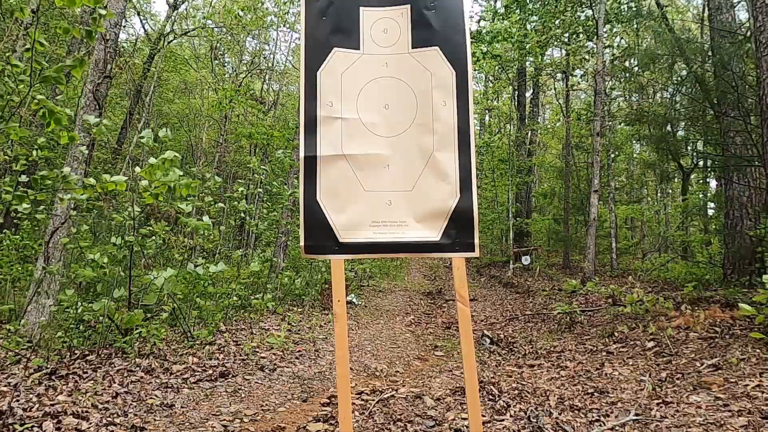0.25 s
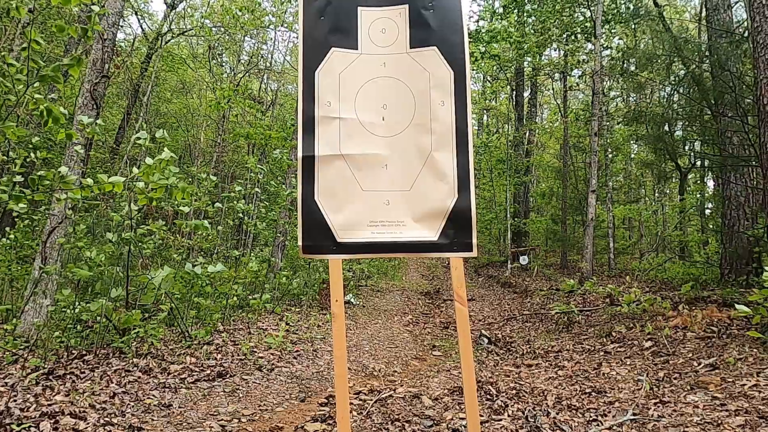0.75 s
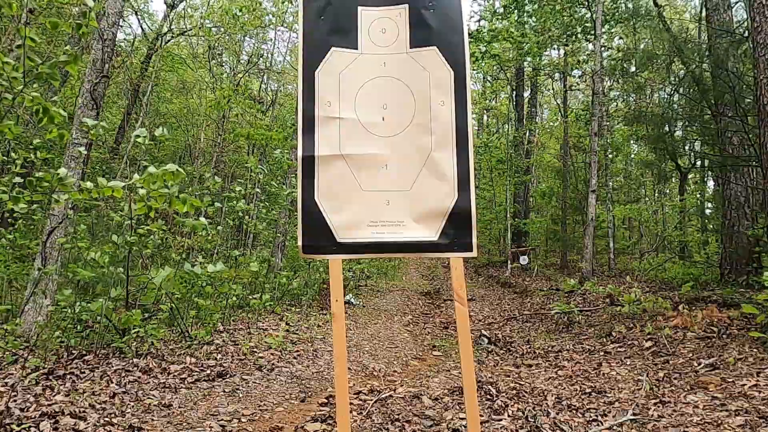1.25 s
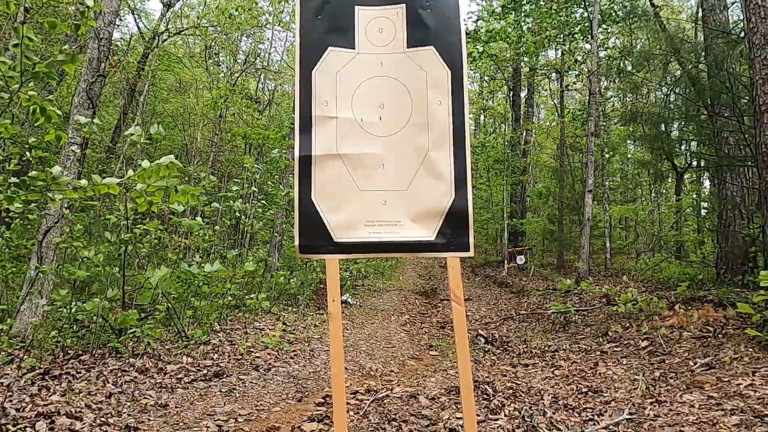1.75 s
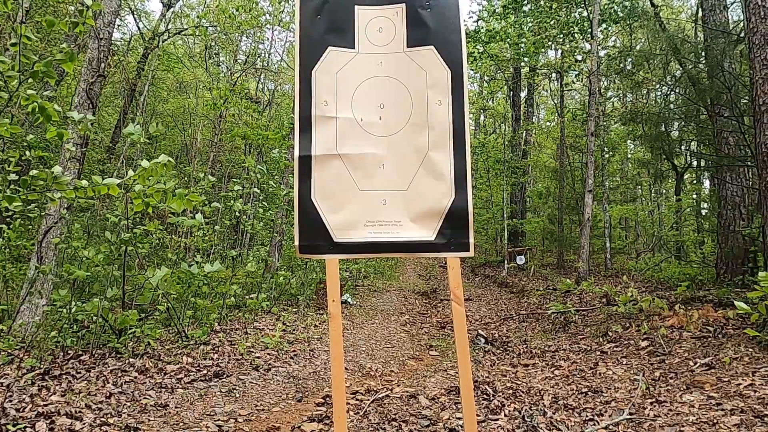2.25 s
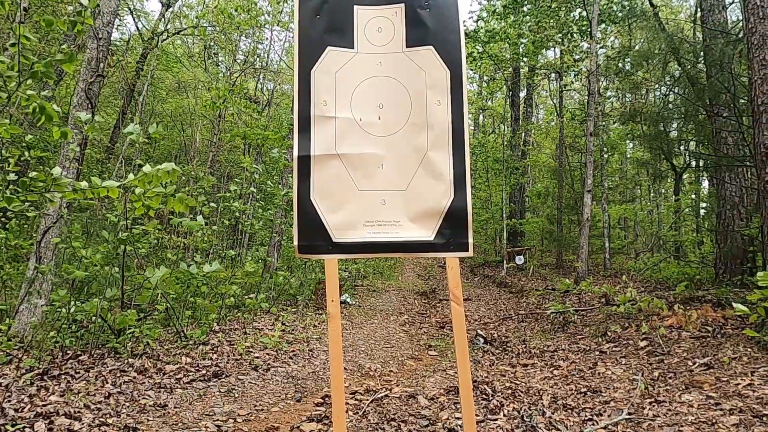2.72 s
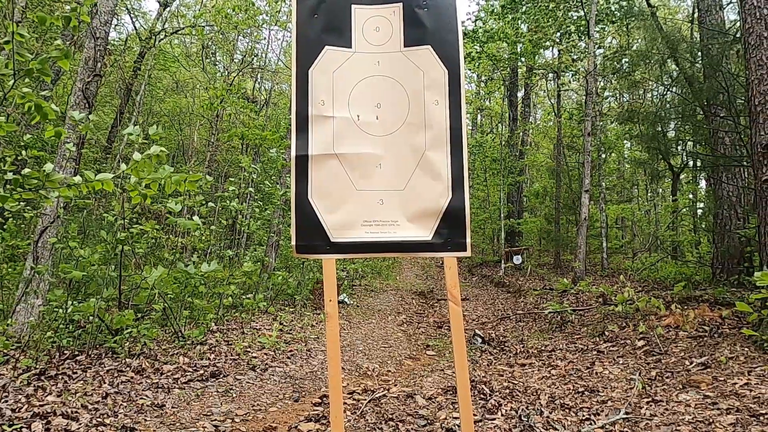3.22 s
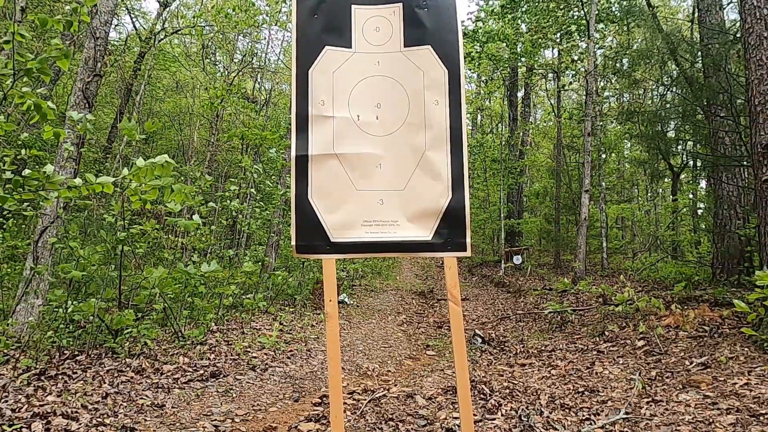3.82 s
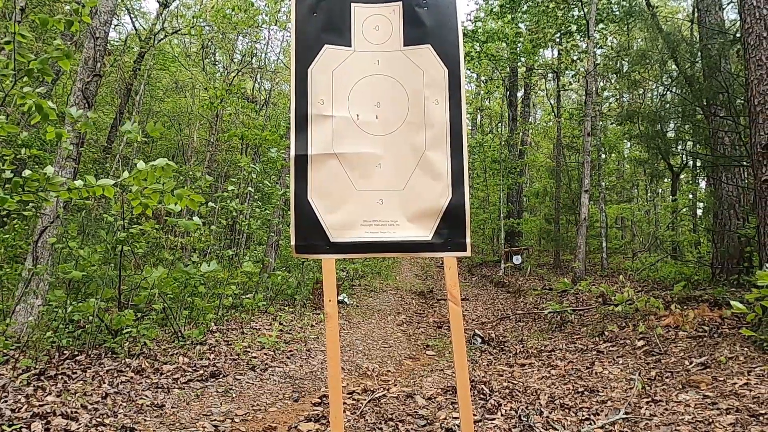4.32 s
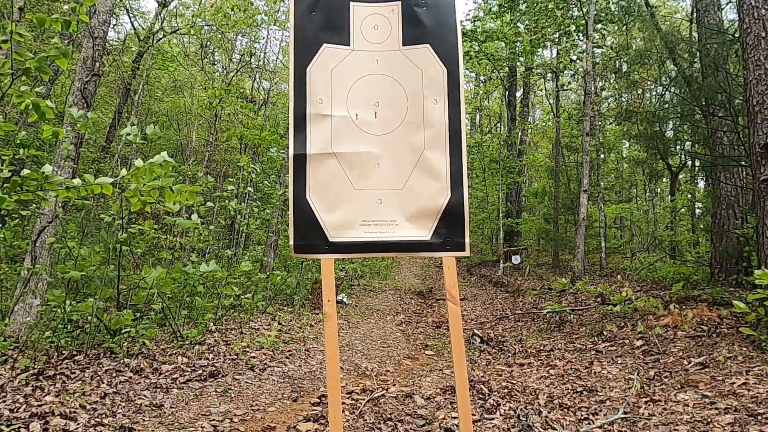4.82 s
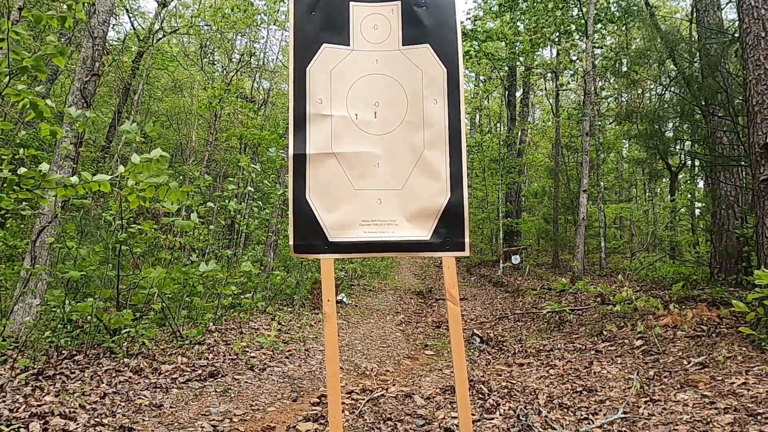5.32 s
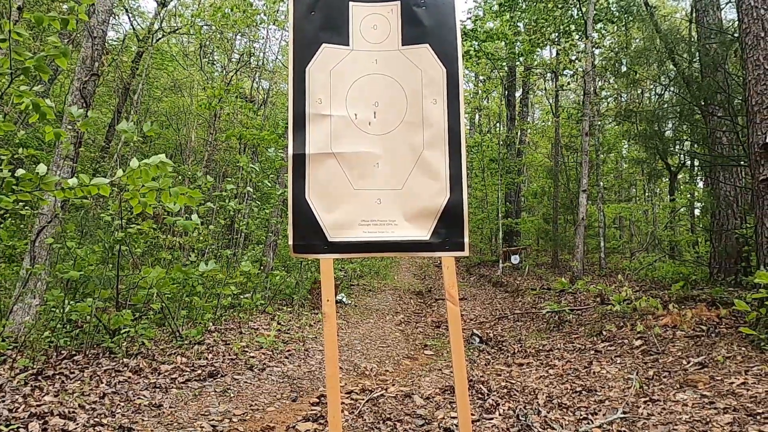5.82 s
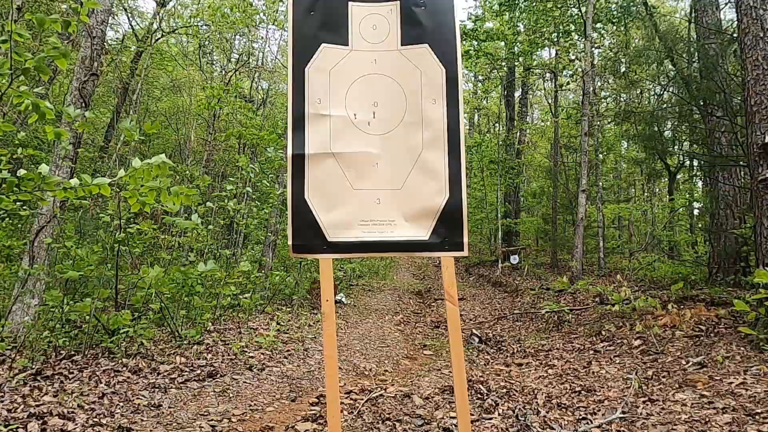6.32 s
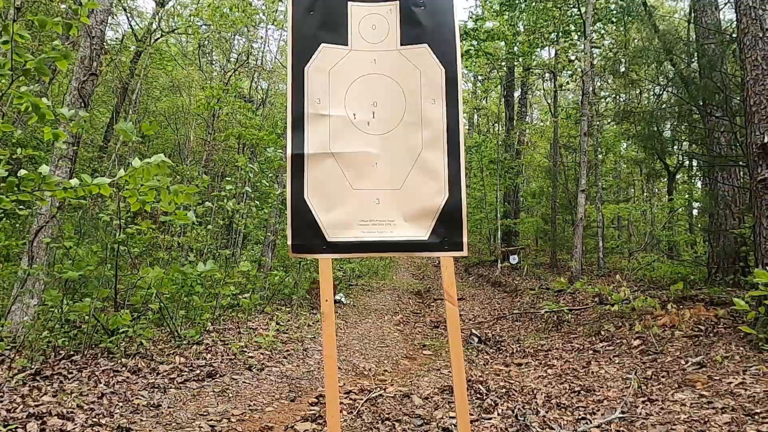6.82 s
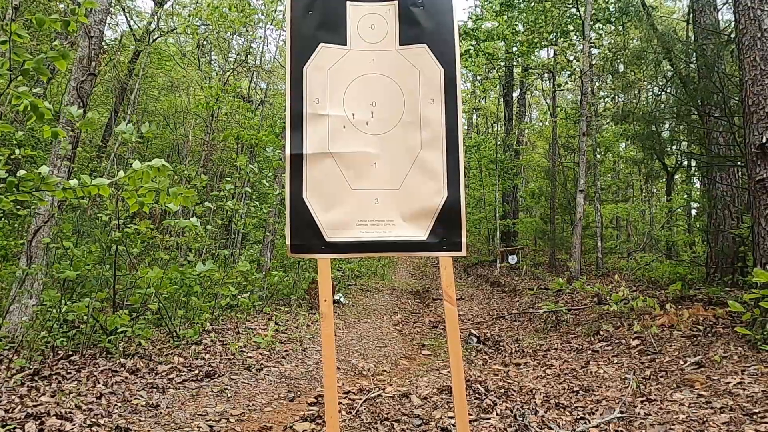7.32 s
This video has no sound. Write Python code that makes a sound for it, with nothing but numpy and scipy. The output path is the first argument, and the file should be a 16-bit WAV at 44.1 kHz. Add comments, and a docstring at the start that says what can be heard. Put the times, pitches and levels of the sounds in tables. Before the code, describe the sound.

Six deliberate handgun shots, heard from near a paper target in the forest, distort the microphone. Each begins with a split-second metallic swell, bursts into a sharp bark and thump, then scatters off trees and rolls down the slope, growing duller. Between them are quiet breeze buffets, barely audible leaves and a few tiny dry ticks. A brief brighter hiss precedes the first shot; the last echo is cut short by the ending.

```python
"""Pistol shots in the woods

Six slow shots on a shooting lane, heard from near the paper target. A short ringing swell of tones leads into
each overloaded blast, built of damped sines and noise; the nearest trunks slap back, then the wooded slope
returns a long roll of banded noise that loses its treble to the air. Shaped noise makes faint leaves, a
breeze rumbling on the microphone and a hiss at the start; dry ticks are short noise bursts with a knock."""
import sys
import numpy as np
from scipy import signal
from scipy.fft import rfft, irfft, next_fast_len
from scipy.io import wavfile
from scipy.ndimage import uniform_filter1d

SR = 44100
rng = np.random.default_rng(int(sys.argv[2]) if len(sys.argv) > 2 else 0)


def wav_out(sig):
    """Save sig, one row per channel (or a flat mono array), as 16-bit PCM at SR to the path in sys.argv[1]."""
    wavfile.write(sys.argv[1], SR, np.round(np.clip(np.atleast_2d(sig).T, -1, 1) * 32767).astype(np.int16))


N = 333396
TIME = np.arange(N) / SR
FREQS = np.maximum(np.fft.rfftfreq(next_fast_len(N), 1 / SR), 1)


def from_db(db):
    """Decibels to gain."""
    return 10 ** (np.asarray(db) / 20)


def at_hz(table, hz, axis=1):
    """Read one column of a table on a log-frequency axis."""
    table = np.array(table, float)
    return np.interp(np.log(hz), np.log(table[:, 0]), table[:, axis])


def add(out, start_s, sound):
    """Mix a sound in from start_s on."""
    start = max(round(start_s * SR), 0)
    out[start:start + len(sound)] += sound[:max(N - start, 0)]


def cut(x, hz, kind):
    """Second-order Butterworth low-, high- or band-pass."""
    sos = signal.butter(2, np.minimum(hz, SR / 2 - 1), kind, fs=SR, output="sos")
    return signal.sosfilt(sos, x)


def fade(t, t60):
    """A decay of 60 dB in t60 seconds."""
    return from_db(-60 * t / t60)


def ring(t, hz, t60):
    """A damped sine that starts at t = 0."""
    t = np.maximum(t, 0)
    return np.sin(2 * np.pi * hz * t) * fade(t, t60)


def bump(x, centre, width):
    """A bell curve of height 1, down to 1/e at width from its centre."""
    return np.exp(-((x - centre) / width) ** 2)


def drift(t, rate):
    """Random values of spread 1, rate of them per unit of t, joined by straight lines."""
    return np.interp(t * rate % 1024, np.arange(1024), rng.standard_normal(1024))


def pink():
    """Spectrum of a noise with rms 1 in every octave above 20 Hz."""
    white = rfft(rng.standard_normal(next_fast_len(N)))
    return white * np.sqrt(SR / 2 / np.log(2) / FREQS) * (FREQS > 20)


def noise(colour):
    """Steady noise whose octave levels follow a colour table."""
    return irfft(pink() * from_db(at_hz(colour, FREQS)))[:N]


# Level changes of the breeze and of the leaves.
# Each row: centre in s, half length in s, change of the breeze in dB, change of the leaves in dB.
LEVEL_CHANGES = [(.04, 0.072, -12, -2), (0.34, 0.069, 13, -3), (.62, 0.17, 6, -2), (1.0, 0.051, 16, -6),
                 (4.379, 0.11, -4.5, 1), (5.35, 0.14, -3.5, 5.5), (6.5, .05, 8.5, -1),
                 (6.716, .17, -10, -4)]


def level_changes():
    """Bell-shaped level changes in dB: one curve for the breeze, one for the leaves."""
    return sum(np.outer(dbs, bump(TIME, s, half_s)) for s, half_s, *dbs in LEVEL_CHANGES)


# Breeze colour. Each row: frequency in Hz, level in dB per octave relative to BREEZE_DB.
RUMBLE = [(20, -5.5), (45, -0.5), (90, -5.5), (200, -13), (500, -43.5), (2000, -78)]
BREEZE_DB = -59


def breeze(puffs_db, lumps_db=3.0, lumps_per_s=9):
    """Air pushing on the microphone: low noise, lumpy, with puffs and lulls."""
    return noise(RUMBLE) * from_db(BREEZE_DB + puffs_db + lumps_db * drift(TIME, lumps_per_s))


# Leaf colour. Each row: frequency in Hz, level in dB per octave relative to LEAVES_DB.
LEAF_COLOUR = [(30, -88.5), (200, -72), (700, -65), (2000, -74), (5000, -79), (6800, -84), (8400, -83.5),
               (10000, -97), (15000, -102)]
LEAVES_DB = 1


def leaves(leaf_changes_db):
    """Leaves as a faint noise with its own rises and falls."""
    return noise(LEAF_COLOUR) * from_db(LEAVES_DB + leaf_changes_db)


# Colour of the brighter opening hiss. Each row: frequency in Hz, level in dB per octave before the drop.
HISS = [(40, -67.5), (130, -46), (350, -51), (1000, -49), (2200, -53.5), (4500, -51), (8000, -54),
        (14000, -70)]
HISS_DROP_S, HISS_DROP_DB, HISS_T60_S = .197, 15, .2


def opening_hiss():
    """Shaped noise that drops abruptly, then dies away from the first shot on."""
    drop = from_db(-HISS_DROP_DB * (TIME > HISS_DROP_S))
    first_shot_s = SHOTS[0][0]
    return noise(HISS) * drop * fade(np.maximum(TIME - first_shot_s, 0), HISS_T60_S)


def air():
    """The bed: breeze and leaves, each with its own level changes, and the opening hiss."""
    puffs_db, leaf_changes_db = level_changes()
    return breeze(puffs_db) + leaves(leaf_changes_db) + opening_hiss()


# Small dry ticks. Each row: start in s, gain in dB.
TICKS = [(0.0936, -13.5), (.118, -41), (0.167, -30), (4.475, -38), (5.215, -42.5), (5.328, -47),
         (5.5897, -40)]


def ticks(body_db=-9, body_hz=1700, body_t60=0.0042, burst_t60=0.0049):
    """Small dry ticks: a band-passed noise burst with a short knock."""
    out, t = np.zeros(N), TIME[:SR // 20]
    for s, db in TICKS:
        burst = rng.standard_normal(len(t)) * fade(t, burst_t60)
        tick = cut(burst, [1400, 7500], "band")
        knock = from_db(body_db) * ring(t, body_hz, body_t60)
        add(out, s, from_db(db) * (tick + knock))
    return out


BRIGHT_FROM_HZ = 1100


def treble(hz):
    """Share of a shot's brightness at a pitch: none in the bass, all of it an octave into the treble."""
    return np.clip(np.log2(hz / BRIGHT_FROM_HZ), 0, 1)


ROLL_PEAK_S, ROLL_RISE_DB_PER_S, ROLL_LOSS_DB_PER_DOUBLING = 0.24, 40, 7.5


def roll_level(age):
    """Roll in dB: climbs until the bulk of the slope has answered, then thins per doubling of the path."""
    climb = ROLL_RISE_DB_PER_S * np.minimum(age - ROLL_PEAK_S, 0)
    return climb - ROLL_LOSS_DB_PER_DOUBLING * np.log2(np.maximum(age / ROLL_PEAK_S, 1))


# Scatter from ground and brush close by; levels precede each shot's echo gain.
# Each row: frequency in Hz, level in dB per octave, t60 in s.
BRUSH = [(40, -45, 0.36), (90.2, -36.5, 0.22), (160, -30.5, 1), (352, -34, 0.78), (701, -29, 0.17),
         (1500, -27.5, 0.17), (3200, -33.5, 0.34), (8000, -39.5, 0.2), (14220, -56.5, .3)]
# Roll from the wooded slope; levels at ROLL_PEAK_S, before each shot's echo gain.
# Each row: frequency in Hz, level in dB per octave, air loss in dB per s.
ROLL = [(40, -71, -2), (88, -47, 5), (153, -54, -2), (353.3, -38, 0), (674, -32, 0), (1270, -32.5, 2),
        (1455, -37.5, 3.5), (2220, -37.5, 8), (3240, -38.5, 20), (4500, -40.5, 29.5), (7000, -50.5, 60),
        (8400, -48.5, 50.5), (9300, -58, 75), (14000, -80.5, 80)]
ECHO_BRIGHT_SHARE = 0.55


def woods(clump_db=0.65, clumps_per_s=60, patchy_db=.5, patches_per_s=30):
    """Countless echoes merge into noise; the same trees answer every shot, and long paths lose their treble."""
    slow, out, spectrum = TIME[::20], np.zeros(N), pink()   # gains are computed at every 20th sample
    s, *_, bright_db, echo_db, stretch = np.transpose(SHOTS)[:, :, None]
    age = np.maximum(slow - s, 0)
    heard = from_db(echo_db) * (age > 0)
    roll_db = roll_level(age / stretch)
    clumps_db = clump_db * drift(age, clumps_per_s)
    centres, step = np.linspace(np.log(25), np.log(16000), 28, retstep=True)
    for centre in centres:
        hz = np.exp(centre)
        overlap = np.maximum(1 - abs(np.log(FREQS) - centre) / step, 0)
        band = irfft(spectrum * overlap)[:N]
        near = from_db(at_hz(BRUSH, hz)) * fade(age, at_hz(BRUSH, hz, axis=2))
        air_loss_db = at_hz(ROLL, hz, axis=2) * (age - ROLL_PEAK_S)
        far = from_db(at_hz(ROLL, hz) + roll_db - air_loss_db)
        shine_db = ECHO_BRIGHT_SHARE * bright_db * treble(hz)
        patches_db = patchy_db * drift(age, patches_per_s)
        gain = heard * np.hypot(near, far) * from_db(shine_db + clumps_db + patches_db)
        all_shots = np.sqrt(np.sum(gain ** 2, axis=0))
        out += band * np.interp(TIME, slow, all_shots)
    return out


# Swell colour. Each row: frequency in Hz, level in dB per octave before each swell's level and colour.
SWELL_COLOUR = [(230, -26.5), (330, -32.5), (470, -22.5), (700, -29), (950, -23), (1600, -21.5),
                (3200, -24.5), (5000, -25), (7200, -32.5), (8500, -34.5), (10500, -38.5), (13000, -49),
                (15500, -70)]
# Fainter rings that all swells share. Each row: frequency in Hz, level in dB before the same changes.
SHARED_RINGS = [(890, -29), (2110, -27), (3515, -32), (4457, -34), (4732, -35.5), (5765, -32.5),
                (6560, -35), (7340, -39), (8675, -41.5)]
TONE_SPACING_HZ, CLUMP_HZ, CLUMP_DB = 93.75, 210, 13
RING_WIDTH_HZ, RING_DB, RING_STEP_DB = 75, -17.5, 4.5   # each own ring is a step weaker than the last
HOLLOW_DEPTH_DB, HOLLOW_OCTAVES = 11.5, 0.14


def ringing_swell(length_s, level_db, hum_hz, hum_db, rings_hz, hollow_hz, bright_db,
                  onset_db=-36, bend=2.76, scatter_hz=4):
    """An uneven comb of tones with a hum, some rings and a hollow; all swell fast and stop at full level."""
    t = np.arange(int(length_s * SR)) / SR
    hz = TONE_SPACING_HZ * np.arange(2.5, CUTOFF_HZ / TONE_SPACING_HZ)
    # strong and weak tones in random clumps, evened out over 11 tones
    unevenness = np.minimum(drift(hz, 1 / CLUMP_HZ), 1)
    clumps = from_db(CLUMP_DB * unevenness * np.minimum(hz / BRIGHT_FROM_HZ / 2, 1))
    clumps = clumps / np.sqrt(uniform_filter1d(clumps ** 2, size=11))
    octaves_per_tone = TONE_SPACING_HZ / hz / np.log(2)
    power = (clumps * from_db(at_hz(SWELL_COLOUR, hz))) ** 2 * octaves_per_tone
    for ring_hz, db in SHARED_RINGS:
        power = power + (from_db(db) * bump(hz, ring_hz, RING_WIDTH_HZ)) ** 2
    own_rings = sum(from_db(RING_DB - k * RING_STEP_DB) * bump(hz, ring_hz, RING_WIDTH_HZ)
                    for k, ring_hz in enumerate(rings_hz))
    hollow_db = HOLLOW_DEPTH_DB * bump(np.log2(hz / hollow_hz), 0, HOLLOW_OCTAVES)
    colour_db = bright_db * treble(hz) - hollow_db
    comb = np.hypot(np.sqrt(power) * from_db(level_db + colour_db), own_rings)
    gains = np.append(comb, from_db(hum_db))
    hz = np.append(hz + scatter_hz * rng.standard_normal(len(hz)), hum_hz)
    cycles = hz[:, None] * t + rng.random((len(hz), 1))
    tones = gains @ np.sin(2 * np.pi * cycles)
    rise = from_db(onset_db * (1 - t / length_s) ** bend)
    return np.sqrt(2) * tones * rise


# Boom modes of alternating sign, before each shot's boom level and pitch ratio.
# Each row: frequency in Hz, level in dB, t60 in s.
BOOM = [(242, -6, 0.035), (80.9, -11, 0.062), (169, -12.5, 0.088), (775, -11, 0.04)]
# Slaps from the nearest trunks. Each row: delay in s, level in dB, low-pass corner in Hz.
SLAPS = [(0.0098, -8.5, 6830), (0.018, -10.5, 1950), (0.049, -18.5, 2500)]
BARK_HZ, BARK_DB, BARK_T60_S = 1000, 9.5, 0.0075


def blast(boom_db, pitch, crackle_db=-12, crackle_t60=.03, crackle_hz=4500, slap_t60=0.0025,
          splinter_db=-8, splinter_t60=0.031, vary=0.024):
    """The muzzle wave: a hard bark, a low boom and a crackle, then slaps from the nearest trunks."""
    t = np.arange(N // 30) / SR
    pitch_jitter = 1 + vary * rng.standard_normal()
    out = -from_db(BARK_DB) * ring(t, BARK_HZ * pitch_jitter, BARK_T60_S)
    after_peak = t - 1 / (4 * BARK_HZ)   # the boom waits a quarter cycle of the nominal bark
    for k, (hz, db, t60) in enumerate(BOOM):
        out += (-1) ** k * from_db(boom_db + db) * ring(after_peak, hz * pitch * pitch_jitter, t60)
    crackle = cut(rng.standard_normal(len(t)), crackle_hz, "low")
    out += crackle * from_db(crackle_db) * fade(t, crackle_t60)
    for delay_s, db, top_hz in SLAPS:
        # rough trunks splinter each reflection
        splinters = rng.standard_normal(len(t)) * from_db(splinter_db) * fade(t, splinter_t60)
        slap = splinters - from_db(BARK_DB) * ring(t, BARK_HZ, slap_t60)
        out += from_db(db) * np.interp(t - delay_s, t, cut(slap, top_hz, "low"), left=0)
    return out


# Shots and their swells. Each row: time in s, blast in dB, boom in dB, boom pitch ratio, swell length in s,
# swell in dB, hum in Hz, hum in dB, three own rings in Hz, hollow in Hz, brightness in dB, echo in dB,
# echo stretch ratio.
SHOTS = [(0.403, -4, 3.5, 1, 0.045, 1.5, 151.5, -13.5, 2146, 1290, 894, 8470, 2.5, 0.36, 1.23),
         (1.6947, -1.5, 1.5, 1.03, .042, 0, 232.5, -19, 1030, 2465, 2210, 3320, -2.5, 0.48, 1.017),
         (2.88, -2, 3, 1.01, 0.038, -2.5, 165.3, -17, 1122, 2240, 2916, 3650, -1.5, -0.59, 1),
         (4.5193, -0.5, 2, 0.99, .042, -0.5, 155.5, -18.5, 1683, 1072, 2770, 2260, 1.5, 1, 1.034),
         (5.6317, -3.5, 4.5, 0.916, .038, -2, 416, -28.5, 1070, 1580, 2020, 2770, -2, -0.5, .96),
         (7.0479, -4, 5, 0.997, 0.04, -0.5, 482, -23, 1590, 1246, 2870, 5970, 2.5, 1.0, 1.086)]


def swells_and_blasts(swell_lead_s=.0008):
    """A ringing swell of tones leads into each blast."""
    out = np.zeros(N)
    for (s, blast_db, boom_db, pitch, length_s, swell_db, hum_hz, hum_db,
         *rings_hz, hollow_hz, bright_db, _, _) in SHOTS:
        swell = ringing_swell(length_s, swell_db, hum_hz, hum_db, rings_hz, hollow_hz, bright_db)
        add(out, s - swell_lead_s - length_s, swell)
        add(out, s - 1 / (2 * BARK_HZ), from_db(blast_db) * blast(boom_db, pitch))
    return out


def scene():
    """One microphone feeds both channels."""
    return np.tile(air() + ticks() + woods() + swells_and_blasts(), (2, 1))


CUTOFF_HZ = 15800


def record(dry, bass_cut_hz=30):
    """The microphone drops the deepest bass; the blasts overload the input and are rounded off; the top is cut."""
    heard = cut(dry, bass_cut_hz, "high")
    rounded = heard / (1 + heard ** 4) ** (1 / 4)
    top_cut = signal.ellip(10, .1, 80, CUTOFF_HZ, fs=SR, output="sos")
    return signal.sosfilt(top_cut, rounded)


dry = scene()
out = record(dry)
wav_out(out)
```